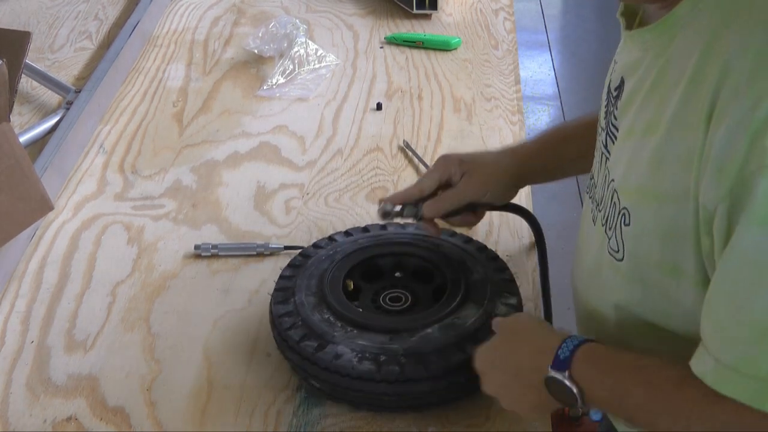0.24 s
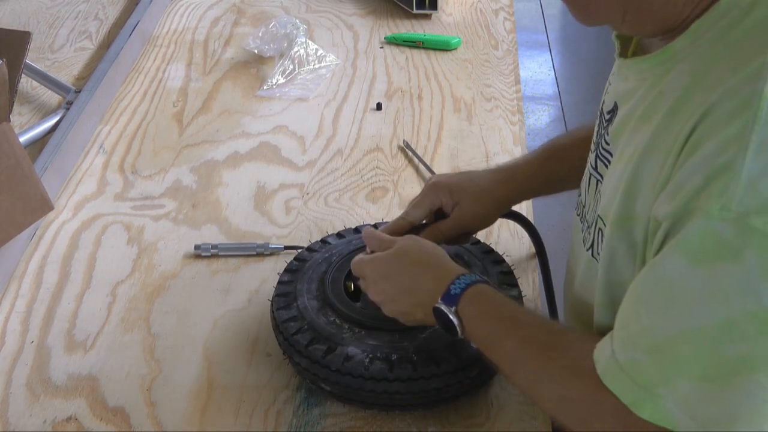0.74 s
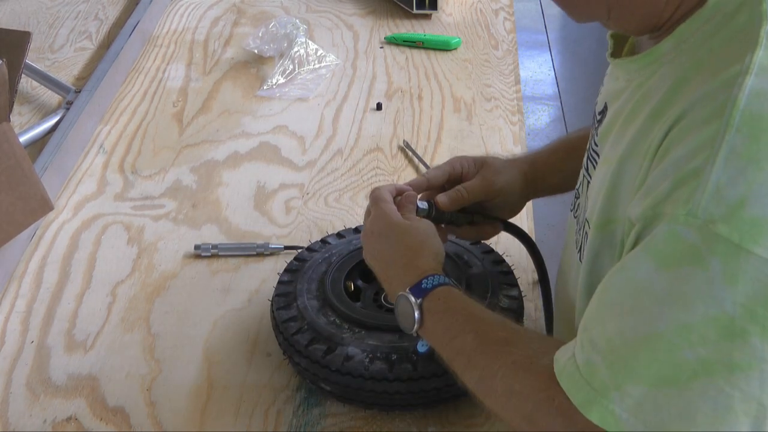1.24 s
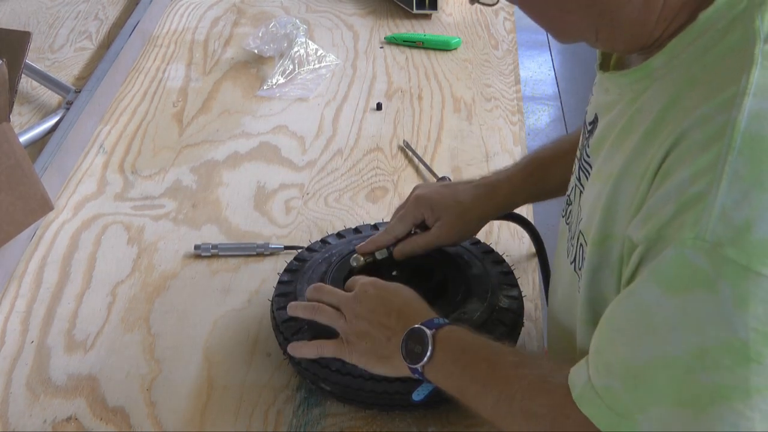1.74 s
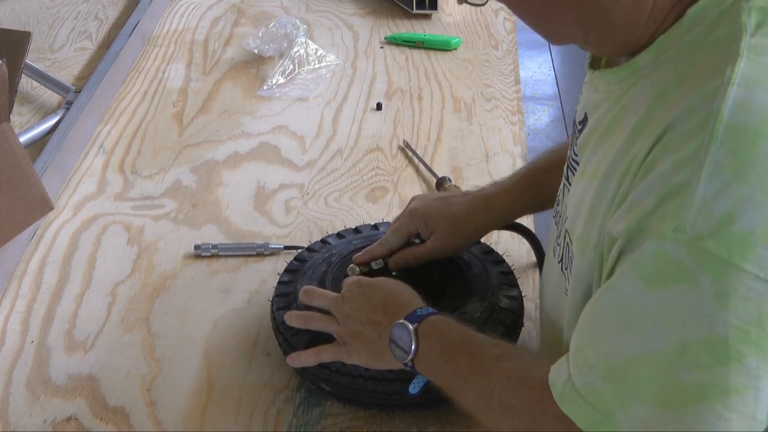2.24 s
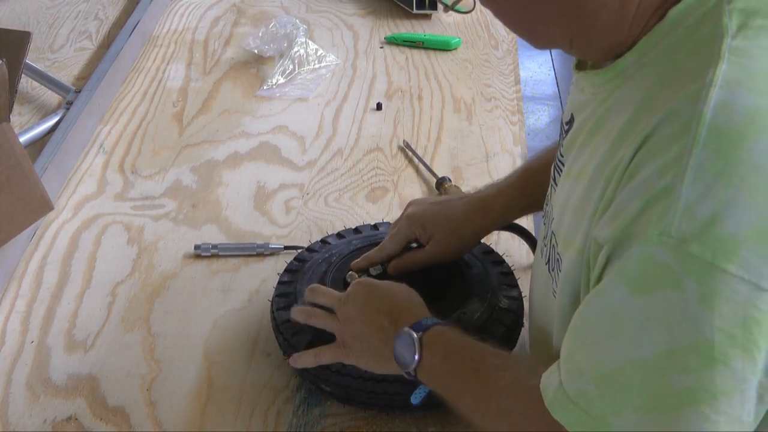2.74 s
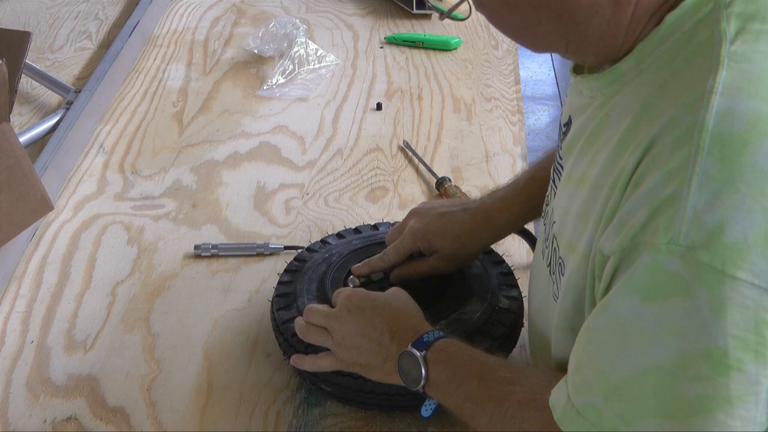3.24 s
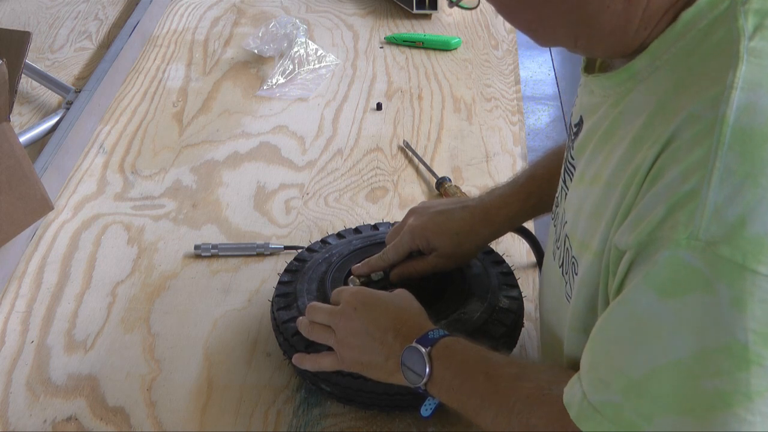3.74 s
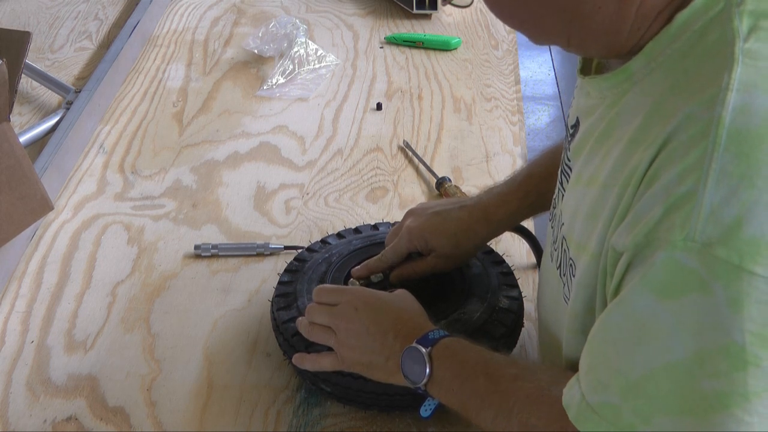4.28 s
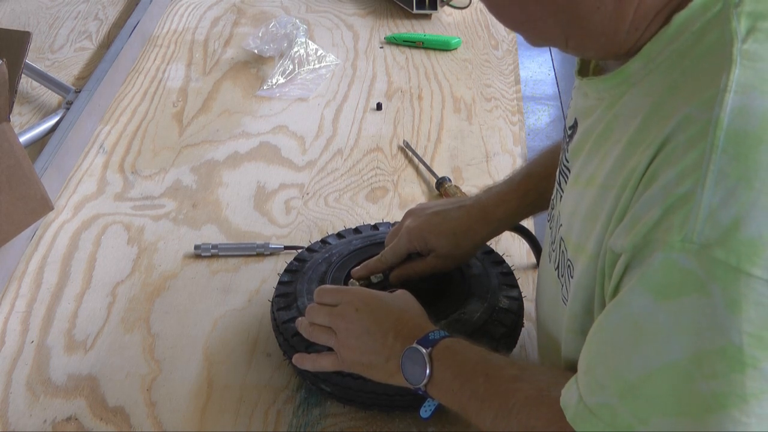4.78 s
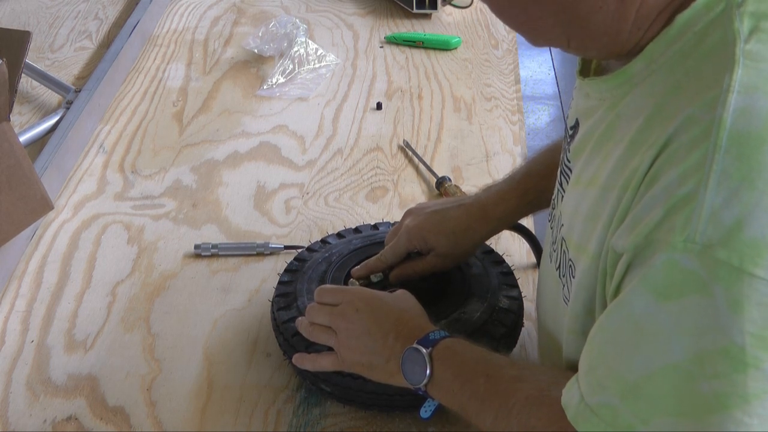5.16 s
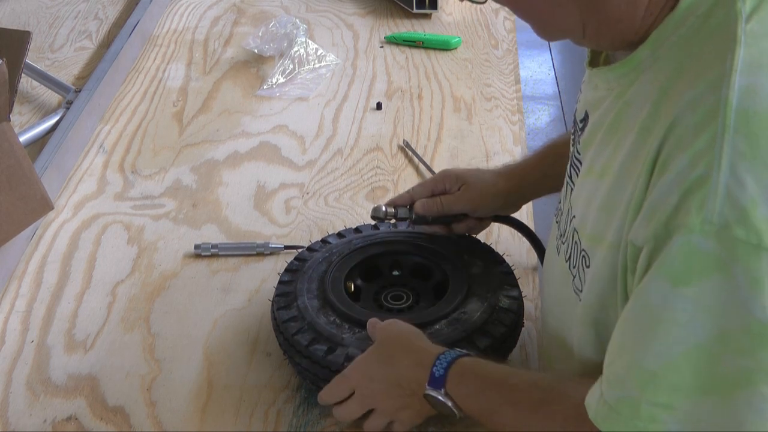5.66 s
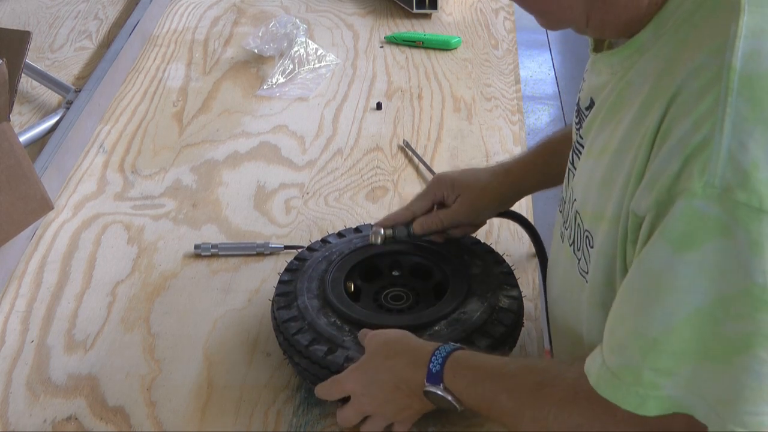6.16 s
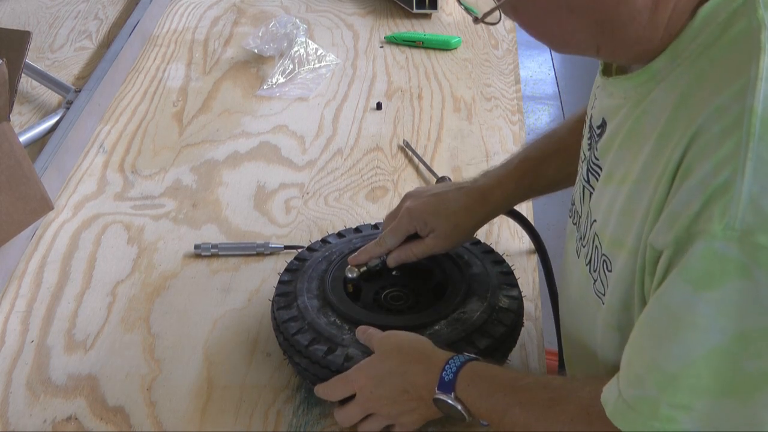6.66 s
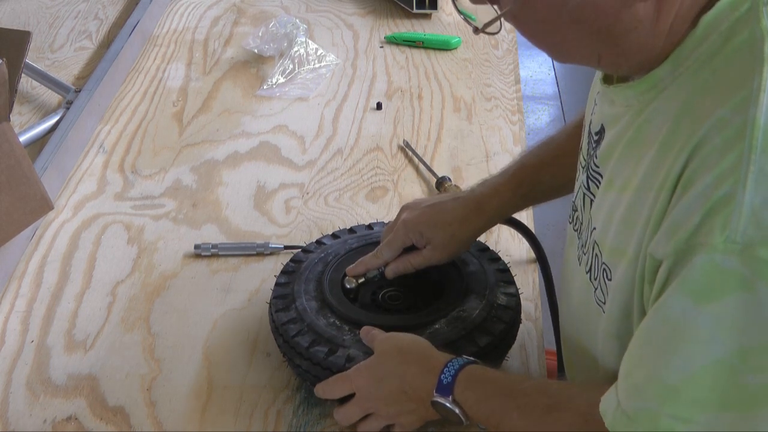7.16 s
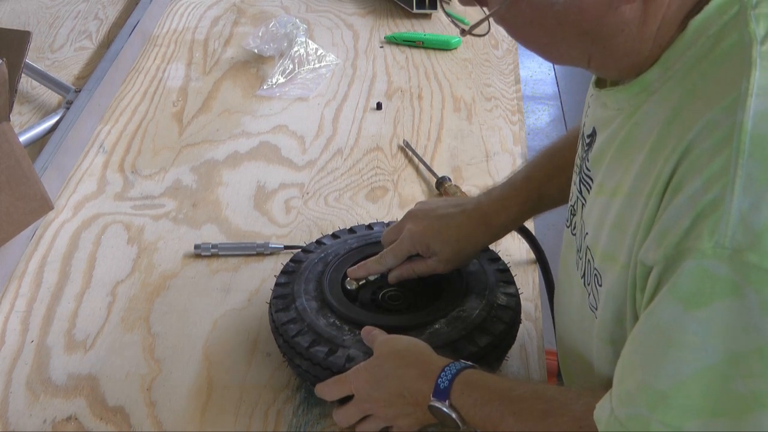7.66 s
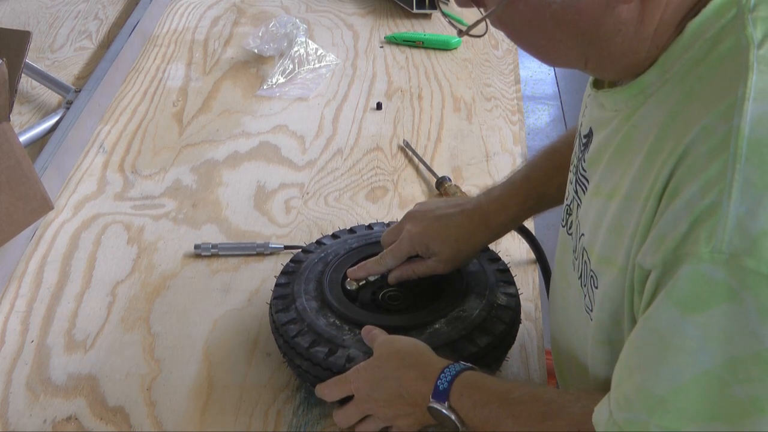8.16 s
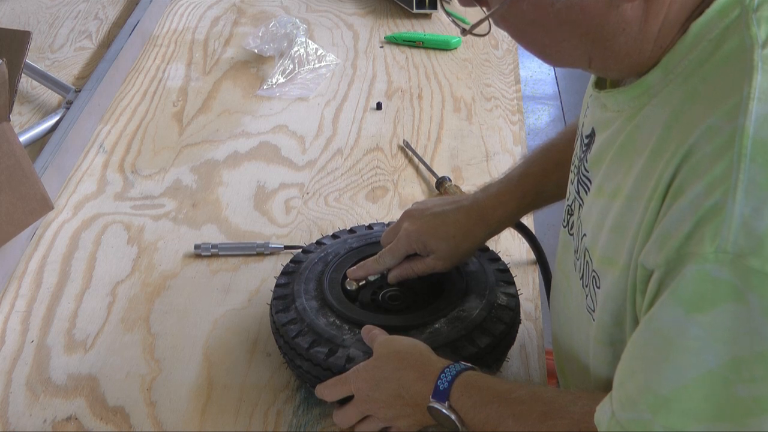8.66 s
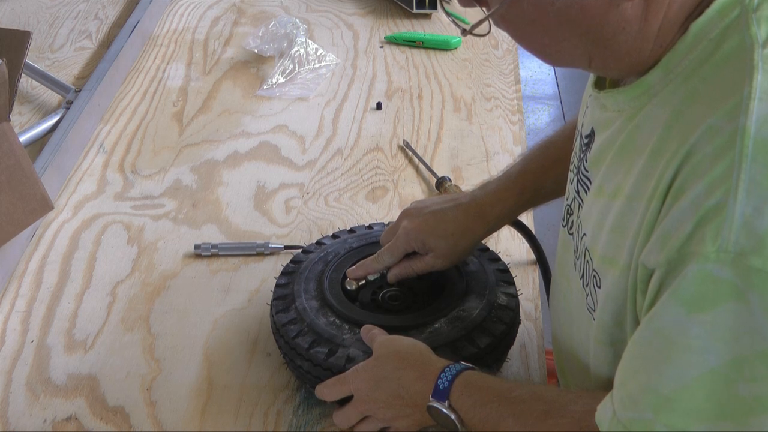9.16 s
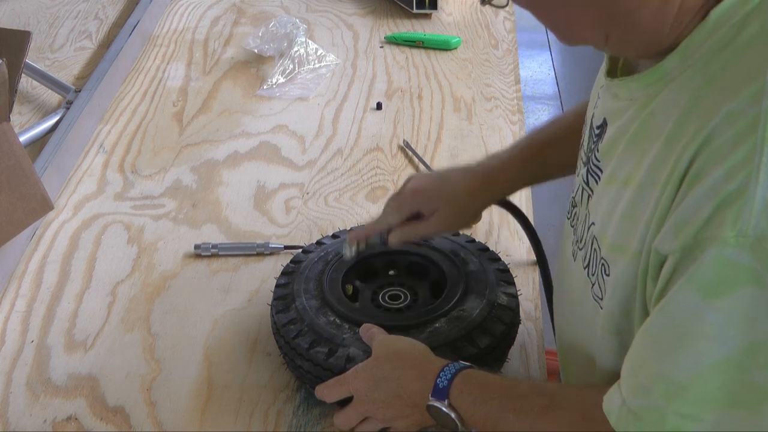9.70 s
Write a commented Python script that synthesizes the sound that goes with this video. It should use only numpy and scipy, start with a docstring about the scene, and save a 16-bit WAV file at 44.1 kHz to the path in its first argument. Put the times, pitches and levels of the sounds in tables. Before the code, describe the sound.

A small tyre on a plywood bench in a workshop, heard close with a slight room tail over a low distant rumble and very faint whine. From 0 to 0.6 s rubber rasps and judders over the wood, fading, with a knock near 0.35. Thin air leaks swell around 1 and 1.2 s, with a soft thud at 1.4. The leak continues, with light double clicks at 2.1 and a cluster near 2.7. At 3.15 a sharp puff opens a bright rush of air, which eases to a wavering hiss, then swells strongly from 4.6 until a puff at 5.4 and a sighing decay. Firmer knocks come at 5.75, 6.8 and 7.26 amid thin leaking. The hiss rises at 7.3; a puff at 7.6 starts a strong, steady fill, loudest at its onset, ending at 9.76 with a sharp pop of air and fading sigh.

```python
"""Tyre filled from an air chuck.

A small tyre on a plywood bench in a workshop is first dragged (stick-slip ringing plus rasp noise).
Chuck and rim knock now and then: clicks ringing bench and rim modes. The leaking chuck hisses thinly;
fills through the valve roar: noise through the hollows of rim, valve and tyre. Noise bursts puff as
it seats and lifts. A reverberant tail, a low rumble and a faint whine lie behind."""
import sys
import numpy as np
from scipy import signal
from scipy.fft import rfft, irfft
from scipy.io import wavfile
from scipy.ndimage import uniform_filter1d

SR = 44100
rng = np.random.default_rng(int(sys.argv[2]) if len(sys.argv) > 2 else 0)


def wav_record(signal):
    """Record a signal, one row per channel, as 16-bit PCM in the file named by sys.argv[1]."""
    frames = np.transpose(np.atleast_2d(signal))
    bounded = np.clip(frames, -1, 1)
    # unit amplitude maps onto the largest positive 16-bit level
    quanta = np.round(bounded * 32767).astype(np.int16)
    wavfile.write(sys.argv[1], SR, quanta)


N = 437913


def from_db(db):
    """Amplitude gain of a level in dB."""
    return 10 ** (np.asarray(db) / 20)


def rms_one(x):
    """Scaled to unit rms."""
    return x / np.sqrt(np.mean(x ** 2) + 1e-20)


def in_time(rows):
    """Each column after the first, interpolated to a value per sample."""
    s, *columns = np.transpose(rows)
    return [np.interp(np.arange(N) / SR, s, c) for c in columns]


def shaped(x, points):
    """Coloured by a spectrum interpolated on a log-frequency axis."""
    hz, db = np.transpose(points)
    grid = np.maximum(np.arange(N // 2 + 1) * SR / N, 1)
    gain = from_db(np.interp(np.log(grid), np.log(hz), db))
    return irfft(rfft(x) * gain, N)


def drift(rate_hz):
    """Slow random curve of unit rms: noise through two equal poles, made at SR / 40."""
    r = np.exp(-80 * np.pi * rate_hz / SR)
    noise = rng.standard_normal(N // 40 + 2002)
    slow = signal.lfilter([1], [1, -2 * r, r * r], noise)[2000:]   # settled part
    return np.interp(np.arange(N) / 40, np.arange(len(slow)), rms_one(slow))


def ring(clicks, hz, t60_s):
    """A damped mode: a unit click starts a decaying sine of initial height 1."""
    r, w = from_db(-60 / (t60_s * SR)), 2 * np.pi * hz / SR
    return signal.lfilter([0, np.sin(w)], [1, -2 * r * np.cos(w), r * r], clicks + 1e-18)


def resonate(x, hz, width_hz):
    """A resonance with gain 1 on top that passes nothing far below."""
    r = np.exp(-np.pi * width_hz / SR)
    b = [(1 - r * r) / 2, 0, (r * r - 1) / 2]
    return signal.lfilter(b, [1, -2 * r * np.cos(2 * np.pi * hz / SR), r * r], x)


# Rumble spectrum. Each row: frequency in Hz, density in dB per Hz.
RUMBLE_SPECTRUM = [(15, -40), (25, 4), (185, 11.5), (500, 8), (820, 6), (930, -6), (1150, 1), (1600, -21),
                   (2080, -20), (3520, -120)]
RUMBLE_DB = -61.5


def rumble():
    """Distant rumble of the shop: noise with a mostly low spectrum."""
    return from_db(RUMBLE_DB) * rms_one(shaped(rng.standard_normal(N), RUMBLE_SPECTRUM))


WHINE_HZ, WHINE_SPREAD_HZ, WHINE_RMS_DB = 1059, 3.55, -72


def whine():
    """One faint sine whose pitch drifts slightly."""
    hz = WHINE_HZ + WHINE_SPREAD_HZ * drift(3.4)
    return from_db(WHINE_RMS_DB) * np.sqrt(2) * np.sin(2 * np.pi * np.cumsum(hz) / SR)


# Reverberation of the shop. Each row: frequency in Hz, decay time t60 in s.
SHOP_T60 = [(100, 0.77), (400, 0.64), (2000, 0.55)]


def shop(x):
    """Two unrelated reverberant tails: noise that dies octave by octave, building up over 12 ms."""
    t, tail = np.arange(SR // 2) / SR, 0
    t60_hz, t60_s = np.transpose(SHOP_T60)
    for hz in 90 * 2. ** np.arange(7):
        octave_t60_s = np.interp(np.log(hz), np.log(t60_hz), t60_s)
        octave = signal.butter(2, [hz / np.sqrt(2), hz * np.sqrt(2)], "band", fs=SR, output="sos")
        noise = signal.sosfilt(octave, rng.standard_normal((2, len(t))))
        tail = tail + noise * from_db(-60 * t / octave_t60_s)
    tail = tail * np.minimum(t / 0.012, 1)
    return signal.fftconvolve(x[None], rms_one(tail) / np.sqrt(len(t)), axes=1)[:, :N]


# Rubber dragged over plywood. Each row: time in s, rumble in dB, rasp in dB.
DRAG = [(0.0, -44, -34.5), (0.06, -38, -31.5), (0.38, -48, -39), (0.62, -77, -58.5)]
# Rasp spectrum. Each row: frequency in Hz, density in dB per Hz.
RASP = [(900, -10.5), (2500, 2.5), (6000, 2), (12000, -20)]
# Bench modes, also struck by the knocks. Each row: frequency in Hz, relative level in dB, t60 in s.
BENCH = [(163, -9, 0.22), (193, -8, 0.15), (242, -1.5, 0.071), (260, 2.5, 0.042), (327, 2, 0.065),
         (401, 0, 0.058), (545, 11.5, 0.012), (610, 12, 0.0085), (749, -7, 0.084)]
STICKS_PER_S, BENCH_TILT_DB_PER_OCTAVE = 520, -15.0


def drag():
    """The tread sticks and slips at random and shakes the bench; the rubber rasps on the grain."""
    slips = (rng.random(N) < STICKS_PER_S / SR) * rng.standard_normal(N) * from_db(6.1 * drift(19))
    shaking = 0
    for hz, db, t60_s in BENCH:
        tilt_db = BENCH_TILT_DB_PER_OCTAVE * np.log2(hz / 200)
        shaking = shaking + from_db(db + tilt_db) * ring(slips, hz, t60_s)
    rasp = rms_one(shaped(rng.standard_normal(N), RASP)) * from_db(1.0 * drift(23))
    moving = np.arange(N) / SR < DRAG[-1][0]
    rumble_db, rasp_db = in_time(DRAG)
    return (rms_one(shaking) * from_db(rumble_db) + rasp * from_db(rasp_db)) * moving


def struck(at, level_db, modes, spread_db, chatter_s, clean):
    """Each blow is a click with a short ragged chatter, and strikes every mode with its own strength."""
    out, chance = np.zeros(N), rng.standard_normal((len(at), len(modes)))
    fade = np.exp(-1 / (chatter_s * SR))
    for k, (hz, mode_db, t60_s) in enumerate(modes):
        clicks = np.zeros(N)
        clicks[at] = from_db(level_db + mode_db + spread_db * chance[:, k])
        burst = signal.lfilter([np.sqrt(1 - fade ** 2)], [1, -fade], clicks + 1e-18)
        chatter = burst * rng.standard_normal(N)
        out += ring(clean * clicks + chatter, hz, t60_s)
    return out


# Knocks on rim and bench. Each row: time in s, relative thud level in dB, relative tick level in dB.
KNOCKS = [(0.354, -29, -35), (1.383, -34.5, -66), (2.094, -28, -32), (2.106, -26.5, -31), (2.636, -27, -66),
          (2.756, -28, -43), (2.779, -25, -28.5), (2.811, -23.5, -39), (4.795, -29, -49), (5.727, -22, -23),
          (5.75, -19, -22), (5.798, -36, -25), (6.458, -50, -36), (6.618, -38, -54), (6.798, -28, -28),
          (6.815, -24, -28), (7.152, -27, -50), (7.165, -33, -32), (7.261, -20, -21.5)]
# Rim modes. Each row: frequency in Hz, relative level in dB, t60 in s.
RIM = [(1300, 0, .004), (2000, 0, .004), (2650, 0, .006), (3600, -8, .003)]
# loss away from SOFT_HZ, per dB by which the tick is weaker than the thud
SOFT_DB_PER_OCTAVE, SOFT_HZ = 0.03, 327


def knocks():
    """A dull thud of the bench under a short tick of the rim; a thud with a weak tick is rounder."""
    s, thud_db, tick_db = np.transpose(KNOCKS)
    at = np.round(s * SR).astype(int)
    softness = SOFT_DB_PER_OCTAVE * np.maximum(thud_db - tick_db, 0)
    thuds = 0
    for mode in BENCH:
        level_db = thud_db - 16.5 - softness * abs(np.log2(mode[0] / SOFT_HZ))
        thuds = thuds + struck(at, level_db, [mode], spread_db=2.5, chatter_s=0.011, clean=0.27)
    ticks = struck(at, tick_db - 10, RIM, spread_db=1.0, chatter_s=.002, clean=1.5)
    return thuds + ticks


# The seal breaks or closes. Each row: start in s, length in s, blast level in dB, pop level in dB.
PUFFS = [(3.155, 0.013, -19.5, -26), (5.393, 0.028, -17, -43), (7.617, 0.0149, -16, -36),
         (9.758, 0.017, -16, -26)]
# Blast spectrum. Each row: frequency in Hz, density in dB per Hz.
PUFF_SPECTRUM = [(88, -58), (150, -18), (615, -7.5), (1050, -12.5), (2180, -1), (3030, -8.5), (3780, -4.5),
                 (6550, -6.5), (12000, -14)]
# A puff sags, then spurts before it shuts. Points: share of length; gain.
SPURT_AT = [-.25, .15, .5, .85, 1.05]
SPURT = [0, 1, .65, 1.15, 0]
# Pop of the tyre hollow. Each row: frequency in Hz, relative level in dB, t60 in s.
POP_MODES = [(302, -2.5, 0.037), (594, 6.5, 0.031)]


def puffs():
    """Short ragged blasts that shut fast; the tyre hollow pops near the end of each."""
    t, gate, clicks = np.arange(N) / SR, np.zeros(N), np.zeros(N)
    for s, length_s, level_db, pop_db in PUFFS:
        gate += from_db(level_db) * np.interp(t, s + length_s * np.array(SPURT_AT), SPURT)
        clicks[round((s + .8 * length_s) * SR)] = from_db(pop_db)
    blast = rms_one(shaped(rng.standard_normal(N), PUFF_SPECTRUM)) * from_db(1.5 * drift(120))
    pops = sum(from_db(db) * ring(clicks, hz, t60_s) for hz, db, t60_s in POP_MODES)
    return gate * blast + pops


# The chuck's leak as the hand turns it. Each row: time in s, jet in dB, treble in dB.
LEAK = [(0.3, -47, -42), (0.38, -53, -39.5), (0.759, -51, -51.5), (0.8, -56, -44), (1.03, -49.5, -47),
        (1.09, -58, -64), (1.478, -51, -47.5), (1.672, -50, -40.5), (1.8, -44, -45), (1.94, -42, -41),
        (2.3, -41, -41), (3.1, -47, -45), (3.8, -38.5, -37.5), (4.202, -48, -45.5), (4.68, -32.5, -28.5),
        (4.85, -40, -37), (5.5, -58, -52), (5.75, -47.5, -42.5), (5.999, -49.5, -39.5), (6.31, -47, -43.5),
        (6.39, -43.5, -39), (6.668, -49, -44), (7.22, -46, -43.5), (7.3, -36.5, -40), (7.51, -34, -39.5),
        (7.56, -37, -38), (7.7, -51, -57)]
# Tyre hollow and rim hollow against the leak's jet, in dB.
LEAK_HOLLOWS_DB = [-25.5, -14]
# Swells of air: leak spits, fills through the valve, and sighs after a lift. Each row: full at in s,
# rise in s, longest hold in s, fall in s, surge in dB, then tyre hollow, rim hollow, jet and treble in dB.
SWELLS = [(0.984, 0.47, 0.031, 0.27, -4, -60, -49.5, -61, -38.5),
          (1.224, 0.11, 0.038, 0.32, 3, -69, -51.5, -42, -46.5),
          (3.149, 0.025, 0.35, 0.27, -0.5, -34.5, -27.5, -23.5, -33.5),
          (4.736, 0.68, .8, 0.048, -1, -42, -35, -31, -37),
          (5.396, 0.022, 0.018, 1.0, 3.5, -65, -37, -35.5, -43),
          (7.596, 0.054, 0.0042, 0.059, 0, -41.5, -36.5, -27, -30),
          (7.639, 0.029, 2.77, 0.032, 9.5, -42.5, -33, -29, -37.5),
          (9.773, 0.016, .02, .8, -1.5, -69, -38.5, -36, -43.5)]
# Loss in each of the four parts while a swell holds, in dB per s.
SAG_DB_PER_S = [-0.5, 4.5, 2, -1]
# Factor on the opening and shutting swing of each part.
STEEPNESS = [0.96, 0.93, 0.82, 1.3]
SWING_DB, SURGE_S = 24.5, 0.059   # swing per rise or fall time, before STEEPNESS; surge decay


def flow_db():
    """Level of each part of the hiss: the leak and every swell add in power."""
    t = np.arange(0, N, 32) / SR
    s, jet, treble = np.transpose(LEAK)
    jet, treble = np.interp(t, s, jet), np.interp(t, s, treble)
    tyre, rim = jet + LEAK_HOLLOWS_DB[0], jet + LEAK_HOLLOWS_DB[1]
    power = from_db([tyre, rim, jet, treble]) ** 2
    for full, rise, hold, fall, surge_db, *parts_db in SWELLS:
        to_puffs = [puff - full for puff, *_ in PUFFS if puff > full + .1]
        hold = min([hold] + to_puffs)   # held no longer than to the next puff
        since = np.maximum(t - full, 0)
        shut = np.maximum(full - t, 0) / rise + np.maximum(since - hold, 0) / fall
        swing_db = SWING_DB * np.outer(STEEPNESS, shut)
        loss_db = swing_db + np.outer(SAG_DB_PER_S, np.minimum(since, hold))
        opening_db = surge_db * np.exp(-since / SURGE_S)
        power += from_db(np.c_[parts_db] + opening_db - np.minimum(loss_db, 200)) ** 2
    return [np.interp(np.arange(N) / SR, t, 10 * np.log10(p)) for p in power]


# Resonances that the air excites. Each row: frequency in Hz, width in Hz, then the boost over
# the plain hiss in dB for each of the eight colours.
HOLLOWS = [(626, 290, -14, 4.5, 23, -15, 2, -9, 8.5, 9), (1438, 163, 4, 5.5, 22, 7, 10.5, -4, 6.5, 12),
           (2169, 153, 1, 3.5, 9, 3.5, 4.5, -4, 6.5, -4), (2772, 147, -2, -5, -6, 3, 8.5, -16, 8, 0),
           (3500, 710, -22, -40, -14, 4.5, -4, -10, -1.5, -10),
           (4140, 730, 9, 7, 6.5, -2, 3.5, 5, 1.5, 8.5), (4976, 1050, 9.5, 2.5, 5.5, 2.5, 3, -8, 0, 6.5),
           (5710, 2500, 19, 0, 3, 0, -6.5, 14, -11, -8), (6030, 116, -3, -26, -7, 1, 2, 18.5, 3, 10),
           (6490, 270, 21.5, 5.5, 7, -9, -2, 5, 7.5, -9), (7900, 650, 15.5, 0, 4, -5, 0.5, 7, -8.5, 8),
           (8820, 660, -18, 11, 9, -2, 6.5, 1, 9, -9), (9570, 510, 1, 10, 8.5, 6.5, -2, 5, 7, -2),
           (10775, 1560, 7, 9, 7, 9, -3.5, 13, 7.5, 4), (11535, 330, 6, 9.5, 5, 14, 2.5, 11, -2, 4)]
# Colour of the hiss. Each row: start in s, boost column of HOLLOWS (0 to 7).
COLOURS = [(0, 3), (1.75, 0), (3.13, 1), (3.35, 6), (3.62, 3), (4.3, 6), (4.8, 2), (5.42, 1), (5.75, 5),
           (7.24, 7), (7.6, 1), (7.8, 4)]
# Tyre hollow, rim hollow, jet, treble. Each row: low edge in Hz, high edge in Hz.
PARTS_HZ = [(540, 1500), (1600, 3250), (3300, 8200), (8300, 12600)]
WAVER_DB, WAVER_HZ = 1.1, 6.7   # level of each resonance
WANDER_SHARE, WANDER_HZ = .008, 2.5   # pitch of the low hollows as the hand shifts


def air(flutter_db):
    """Turbulent hiss in four parts; the strengths of each part's resonances change with the colour."""
    t, out, flutter = np.arange(N) / SR, 0, drift(4.6)
    since, columns = np.transpose(COLOURS)
    colour = columns.astype(int)[np.searchsorted(since, t, side="right") - 1]
    for (low, high), level_db in zip(PARTS_HZ, flow_db()):
        edges = signal.butter(3, [low, high], "band", fs=SR, output="sos")
        part, power = rms_one(signal.sosfilt(edges, rng.standard_normal(N))), 1
        for hz, width_hz, *boost_db in HOLLOWS:
            if low <= hz < high:
                once = resonate(rng.standard_normal(N), hz, width_hz)
                tone = rms_one(resonate(once, hz, width_hz))
                if high < PARTS_HZ[2][0]:   # tyre and rim: read at a wandering speed
                    place = np.cumsum(1 + WANDER_SHARE * drift(WANDER_HZ)) % (N - 1)
                    tone = np.interp(place, np.arange(N), tone)
                share = np.sqrt(width_hz / (high - low))   # a narrow peak holds little power
                boost = uniform_filter1d(from_db(boost_db)[colour], size=2000)
                gain = share * boost * from_db(WAVER_DB * drift(WAVER_HZ))
                part, power = part + gain * tone, power + gain ** 2
        part_db = level_db + flutter_db * (flutter + drift(22.0))
        out = out + part / np.sqrt(power) * from_db(part_db)
    return out


# Stereo spread of the close sources and tail. Each row: frequency in Hz, side gain in dB.
SIDE_SPECTRUM = [(250, -23), (1000, -33), (2500, -76)]
BENCH_LOW_HZ = 137   # low edge of the knocks and drag, keeps the thuds free of deep bass
SHOP_DB, SHOP_DULL_HZ = -6.5, 503   # the walls return little treble


def scene():
    """Close sources and their tail, nearly in the middle; a little differs between the sides."""
    bench_high = signal.butter(3, BENCH_LOW_HZ, "high", fs=SR, output="sos")
    bench = signal.sosfilt(bench_high, knocks() + drag())
    hits, hiss = puffs() + bench, air(flutter_db=.45)
    far = signal.sosfilt(signal.butter(1, SHOP_DULL_HZ, fs=SR, output="sos"), hits)
    tail, other_tail = from_db(SHOP_DB) * shop(far)
    mid = hits + hiss + tail + rumble() + whine()
    late = np.roll(hits + hiss, 310)   # samples
    side = shaped(late + other_tail, SIDE_SPECTRUM) + from_db(-5.5) * rumble()
    return mid + side * [[1], [-1]]


MIC_LOW_HZ, CUTOFF_HZ = 38, 11880


def record(dry):
    """The microphone drops the deep bass; the top is cut steeply."""
    thin = signal.sosfilt(signal.butter(1, MIC_LOW_HZ, "high", fs=SR, output="sos"), dry)
    return signal.sosfilt(signal.ellip(12, .5, 80, CUTOFF_HZ, fs=SR, output="sos"), thin)


dry = scene()
out = record(dry)
wav_record(out)
```